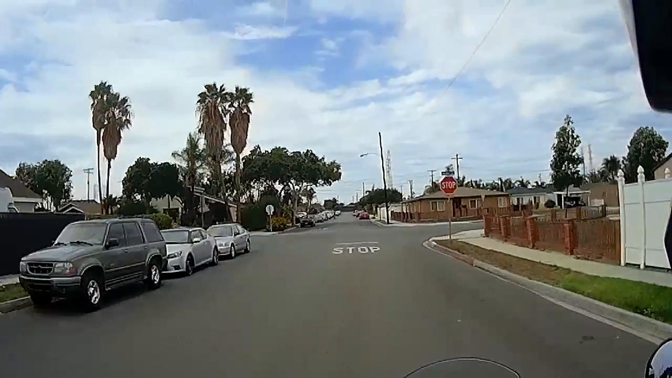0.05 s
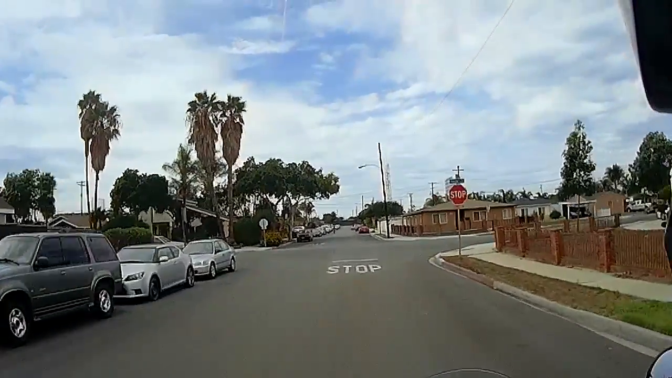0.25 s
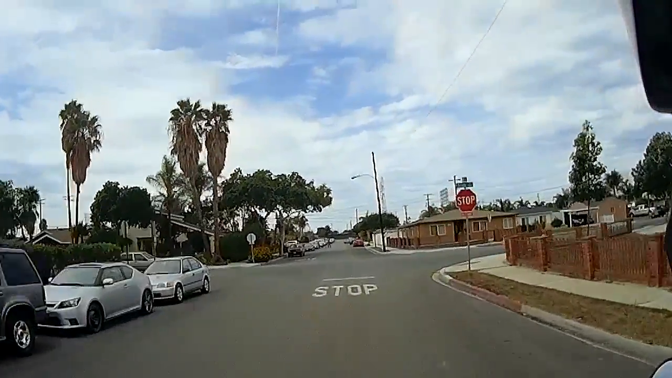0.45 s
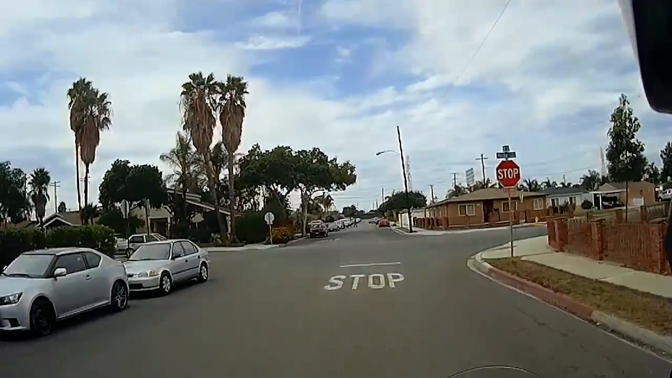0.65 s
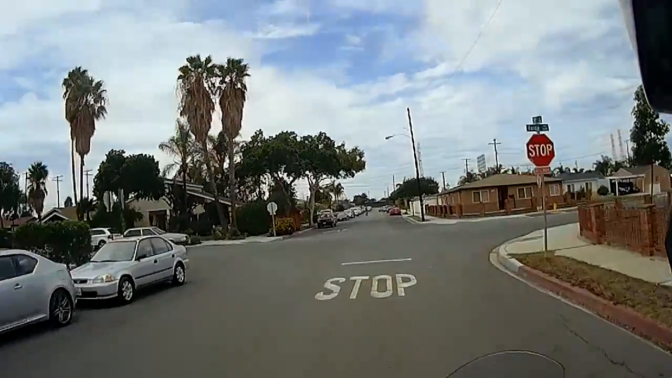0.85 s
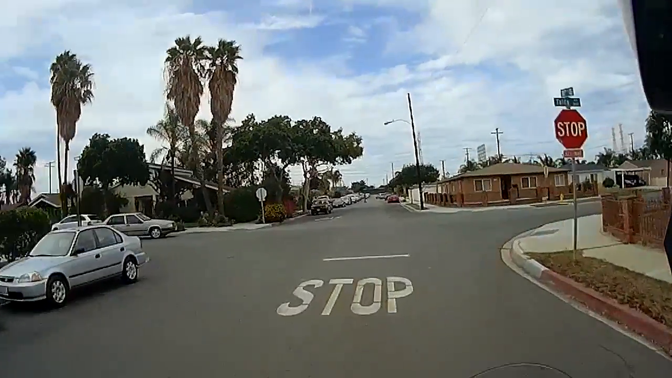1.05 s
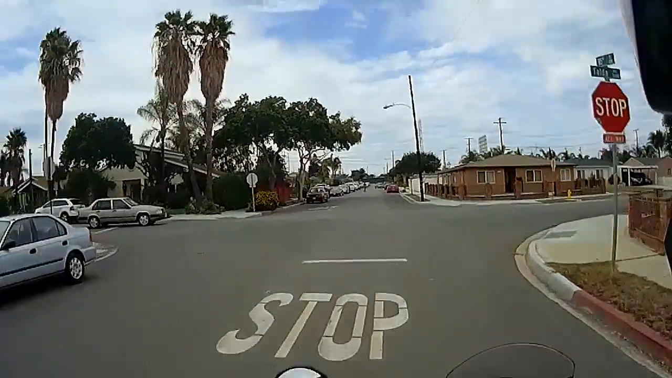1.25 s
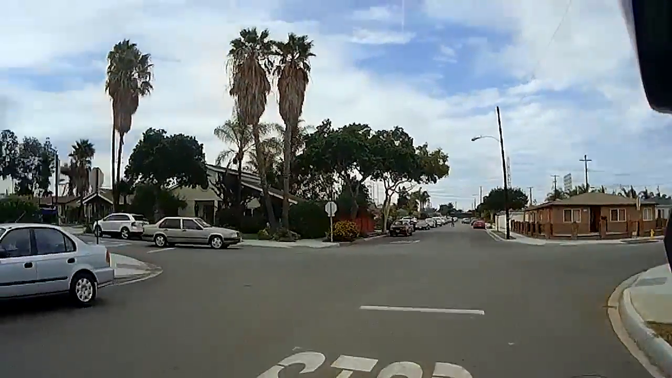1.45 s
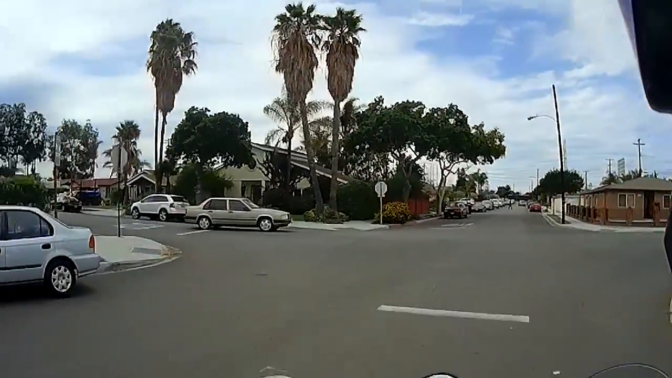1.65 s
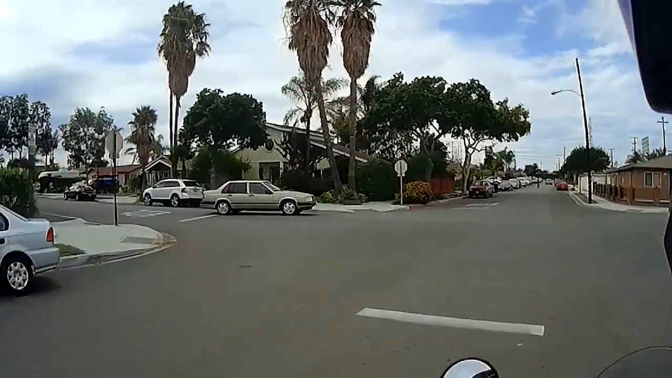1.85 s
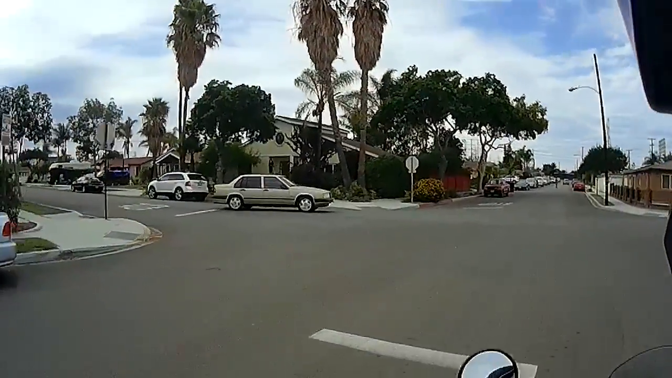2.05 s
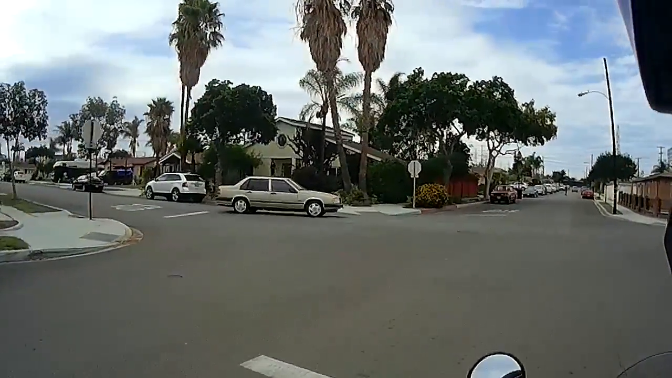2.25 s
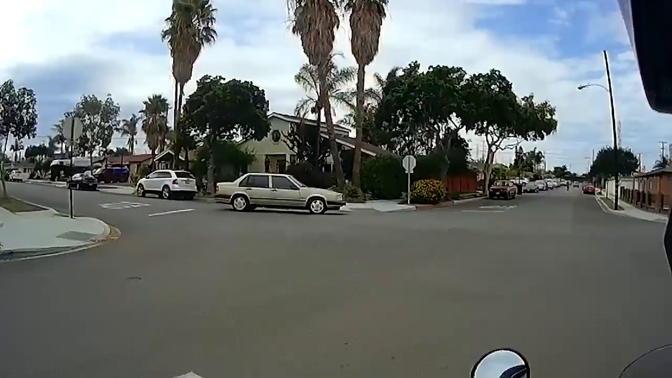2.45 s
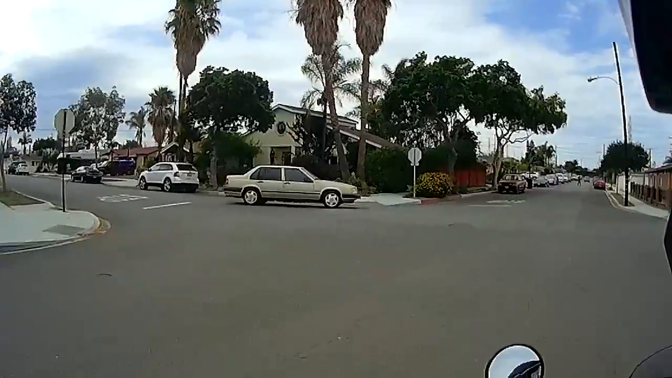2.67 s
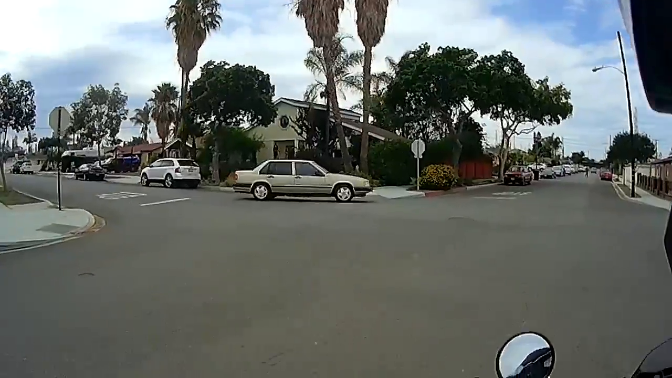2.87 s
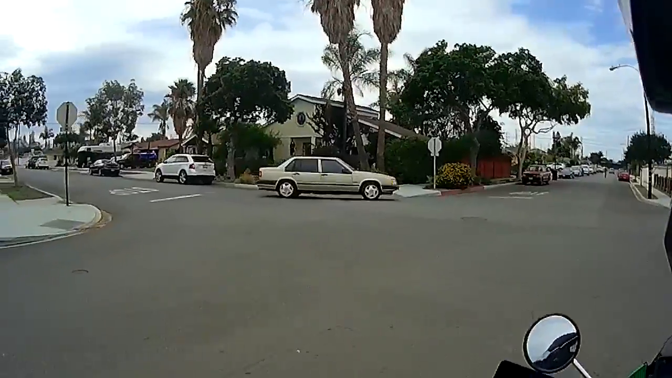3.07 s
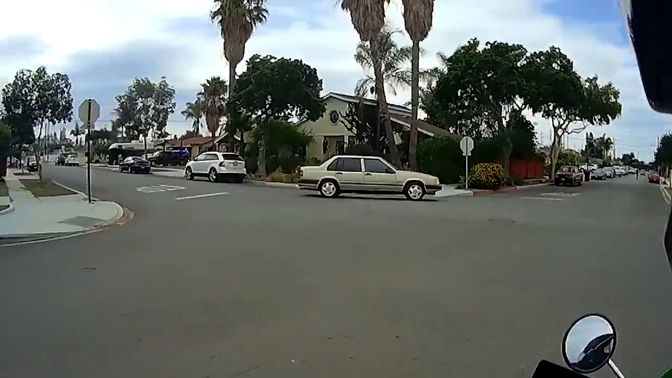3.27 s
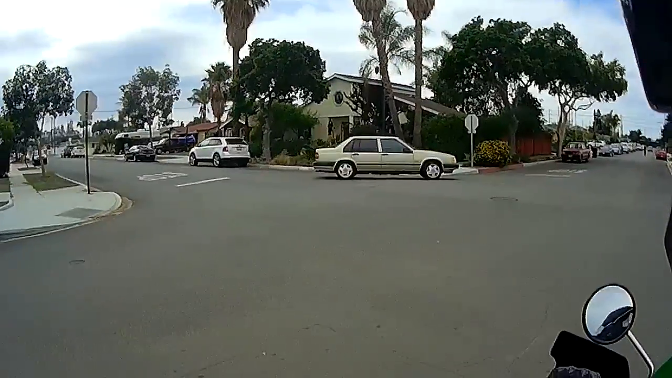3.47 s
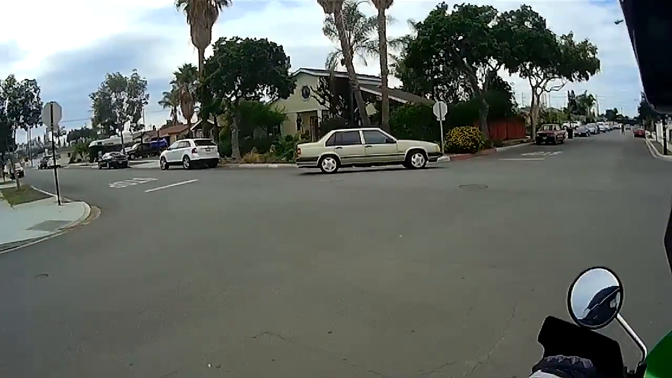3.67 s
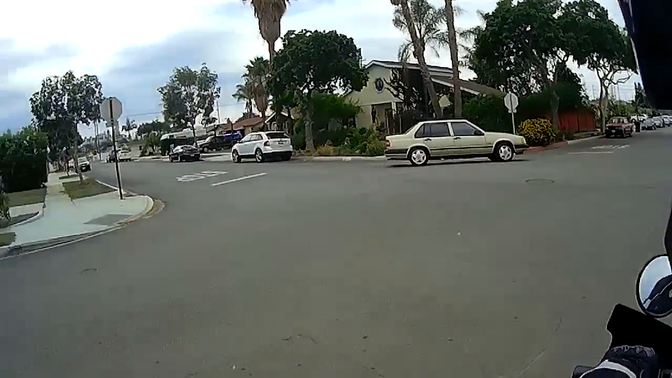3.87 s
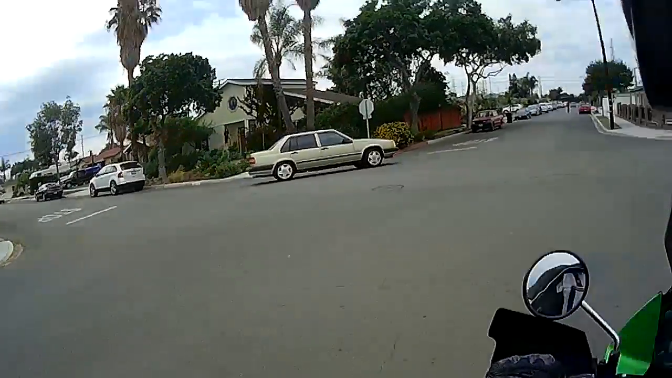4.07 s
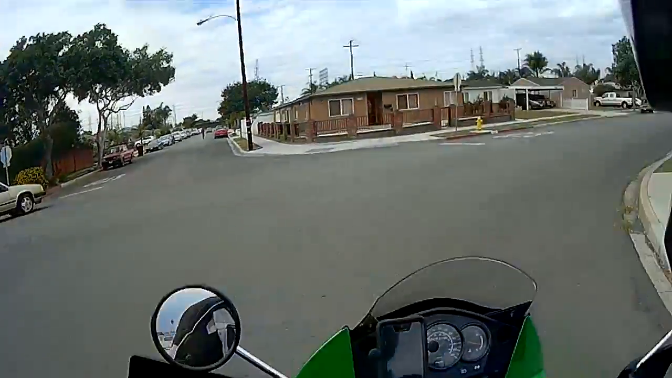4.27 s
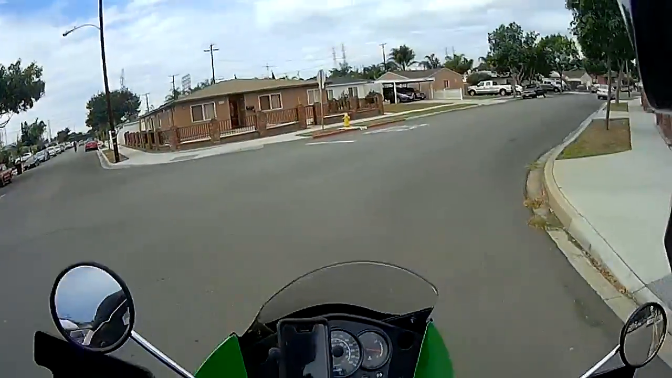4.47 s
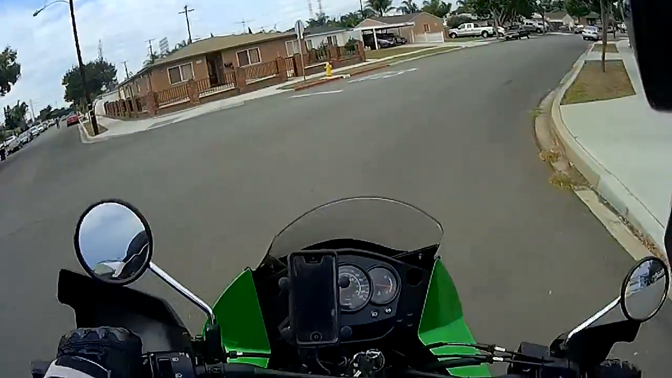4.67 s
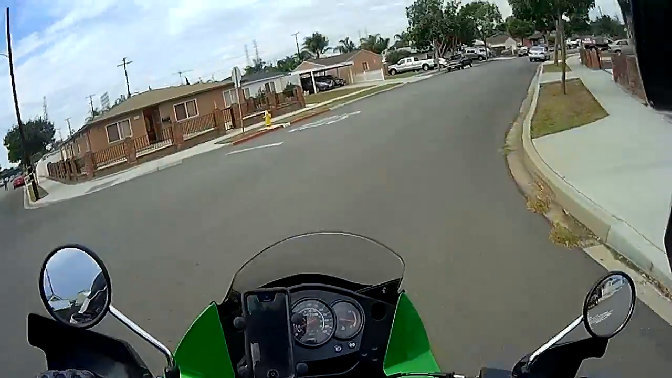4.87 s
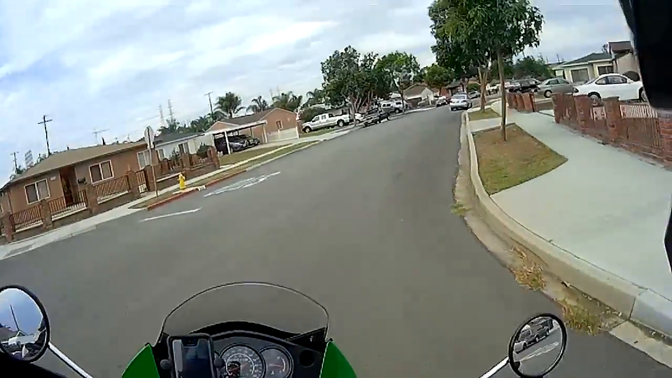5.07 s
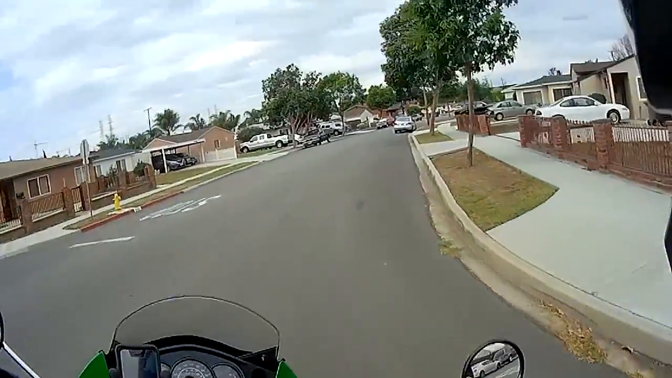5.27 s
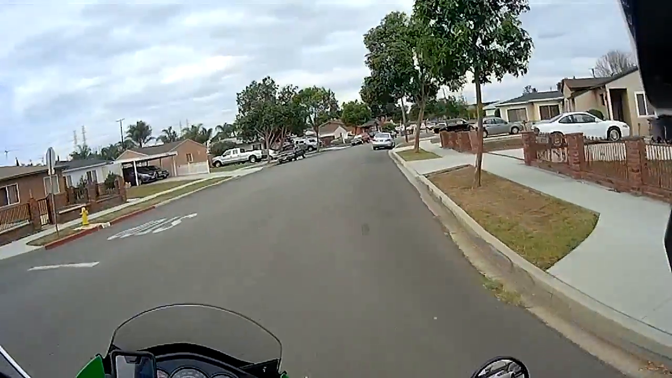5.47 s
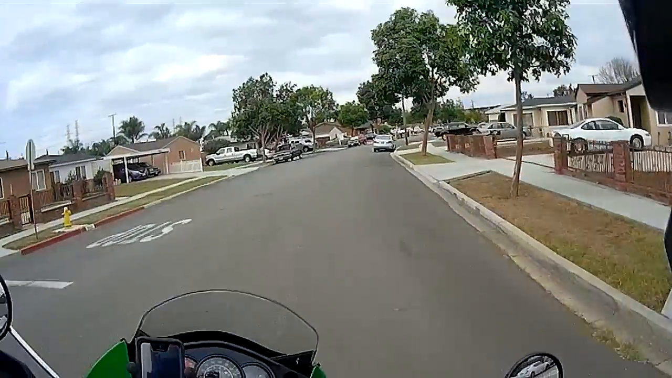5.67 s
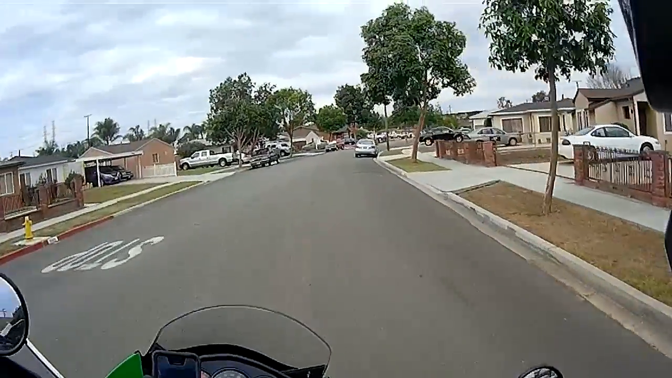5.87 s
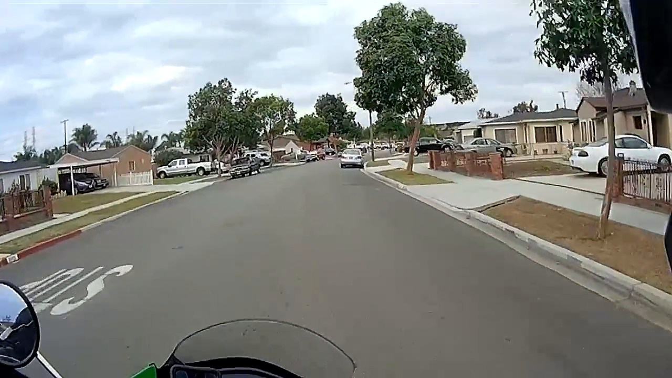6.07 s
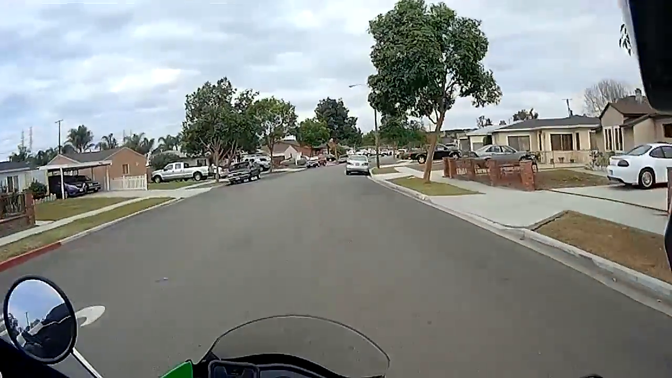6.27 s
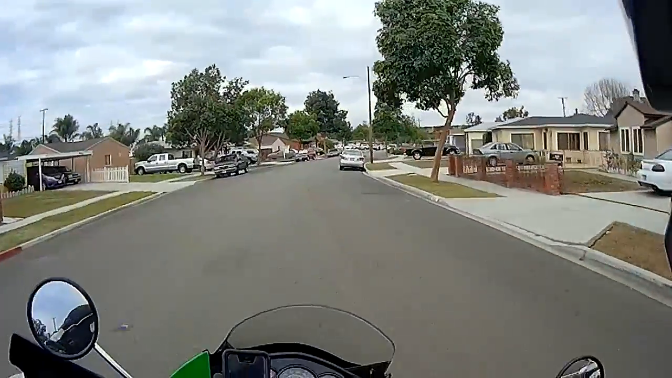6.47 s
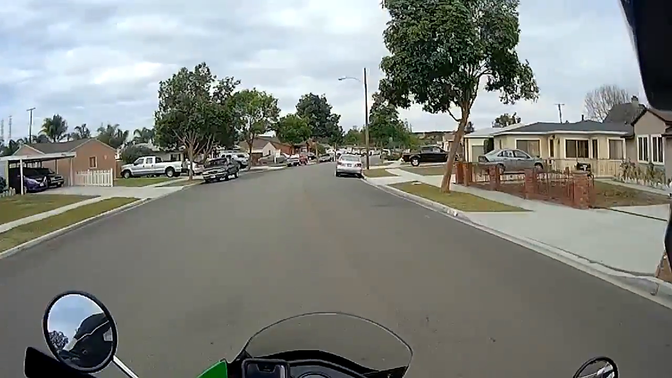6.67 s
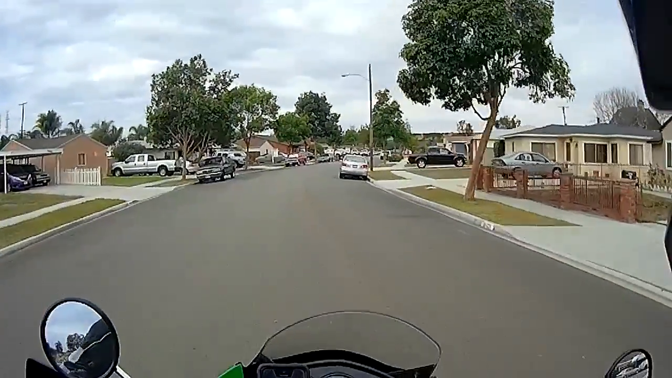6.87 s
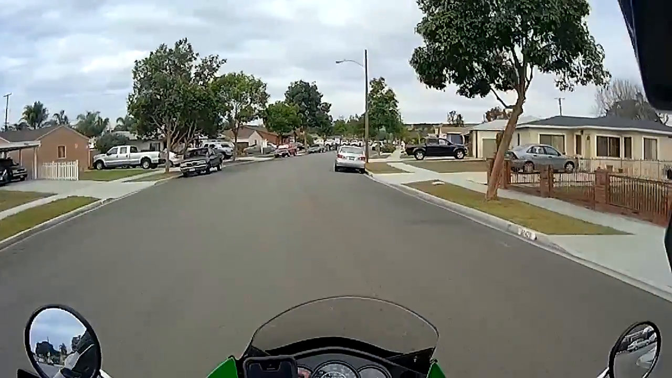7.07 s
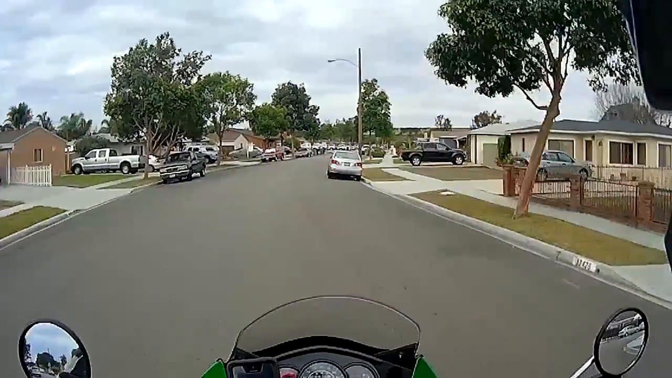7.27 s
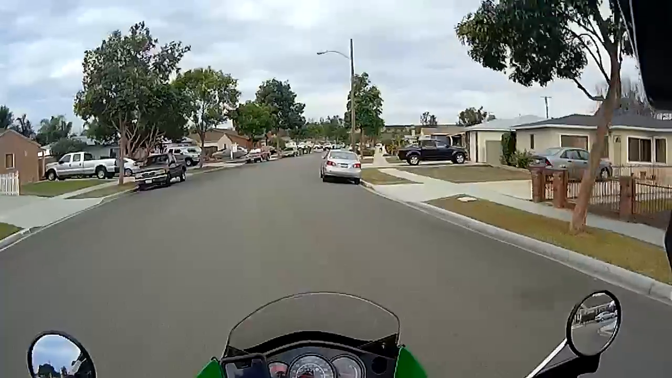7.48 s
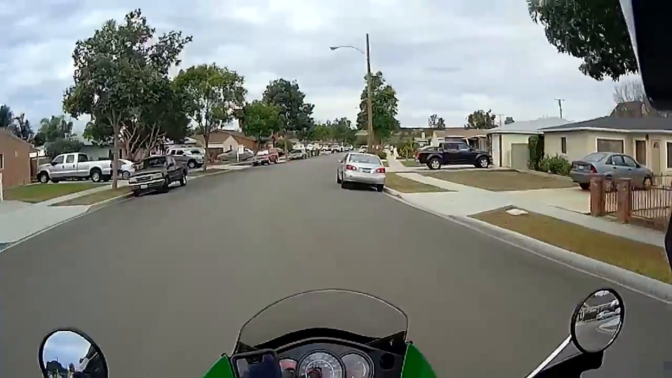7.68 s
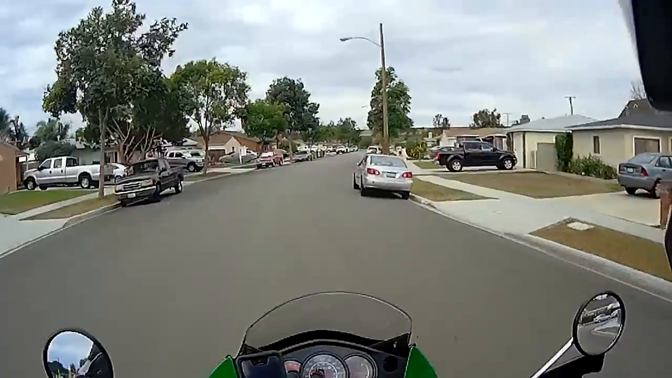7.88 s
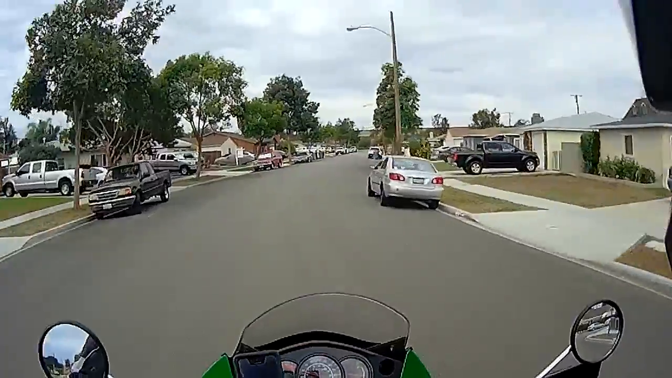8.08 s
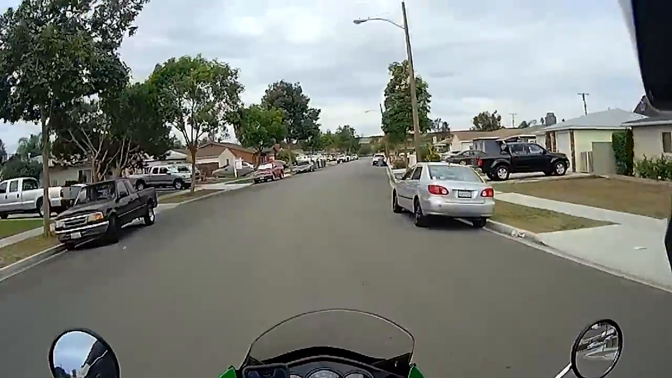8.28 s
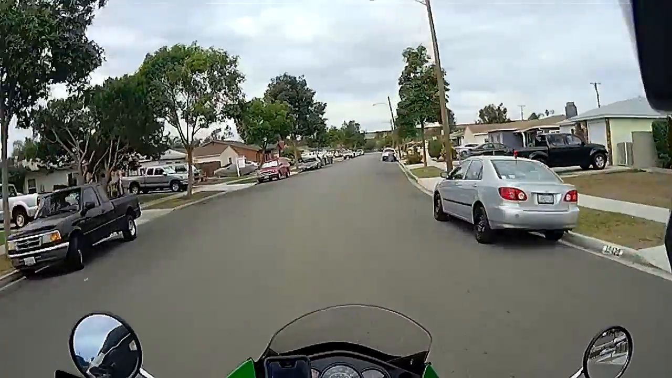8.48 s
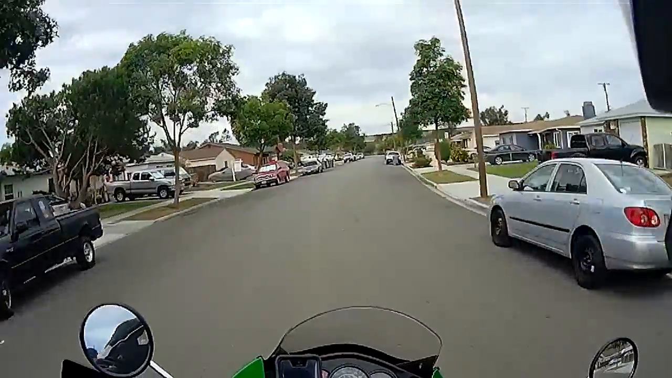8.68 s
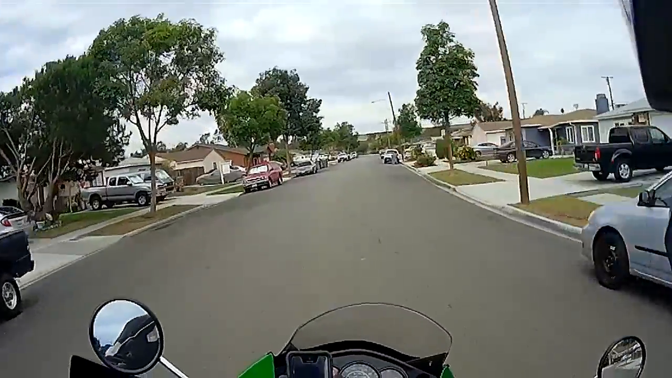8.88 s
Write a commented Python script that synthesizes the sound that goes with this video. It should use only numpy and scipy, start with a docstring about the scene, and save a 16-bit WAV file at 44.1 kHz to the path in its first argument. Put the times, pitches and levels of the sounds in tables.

```python
"""A single-cylinder four-stroke motorcycle, heard from the rider's helmet: it brakes to a junction, idles,
pulls away, changes up and speeds on. Separate exhaust blows thump and ring the pipe at idle, then merge
into a growl under load, while combustion knock and valve ticks pump a roar and a clatter in the metal.
Brake pads rub and squeal, the gear lever clinks, and gusts of wind buffet the microphone at speed."""
import sys
import numpy as np
from scipy import signal
from scipy.fft import rfft, irfft
from scipy.io import wavfile
from scipy.ndimage import uniform_filter1d

SR = 44100
rng = np.random.default_rng(int(sys.argv[2]) if len(sys.argv) > 2 else 0)


def generate_wav(sig):
    """Save sig (samples, or channels by samples) to the path in sys.argv[1] as 16-bit PCM at SR."""
    pcm = np.round(np.clip(np.atleast_2d(sig).T, -1, 1) * 32767).astype(np.int16)
    wavfile.write(sys.argv[1], SR, pcm)


N = 393813

# Firing rate of the cylinder: t/s, f/Hz
FIRING_RATE = [(0.0, 26.46), (0.6, 19.25), (0.8, 23.51), (1.4, 13.5), (1.95, 9.82), (2.93, 10.33),
               (3.35, 10.06), (3.5, 8.15), (3.6, 12.95), (4.0, 22.66), (4.19, 25.16), (4.49, 24.31),
               (5.08, 23.4), (5.57, 30.35), (6.17, 37.13), (6.3, 37.09), (6.63, 26.73), (6.87, 23.69),
               (8.13, 30.98), (8.93, 34.96)]
# Throttle and load (how far the blows merge into a growl): t/s, throttle/0-1, load/0-1
THROTTLE_AND_LOAD = [(0, 0.05, 0.24), (.61, 0, 0.32), (.65, 0.76, .9), (.74, 0.62, 0.3), (.85, 0.16, 0.42),
                     (1.5, 0, .13), (1.95, 0, 0), (3.45, 0, 0), (3.6, .95, .12), (4.05, 1, .2),
                     (4.3, .8, .8), (5.05, 1, 0.67), (6.28, 0.68, 0.83), (6.4, 0, 0.5), (6.72, 0.07, 0.7),
                     (7.0, 0.96, 1), (8.93, 1, 0.92)]
# Fader of the engine case roar; thump, pipe and clatter follow it: t/s, level/dB
ROAR_LEVEL = [(0, -34.5), (.3, -38.5), (.63, -41), (.67, -36.5), (.77, -33), (1.15, -37), (1.33, -44.5),
              (1.48, -41), (2.06, -48.5), (2.7, -50), (3.52, -50), (3.93, -34.5), (4.3, -32.5),
              (5.4, -27.5), (5.54, -25), (5.66, -29.5), (6.12, -27), (6.32, -29), (6.39, -27), (6.74, -38),
              (6.87, -35), (7.25, -30.5), (8.93, -27.5)]
# After-ring of the exhaust pipe: f/Hz, width/Hz, level/dB
PIPE_MODES = [(182.6, 11, -8), (251, 13, 0.5), (358.4, 20, -15)]
# Accents on the growl's overtones: multiple of the firing rate, low-rev level/dB, high-rev level/dB
OVERTONE_ACCENTS = [(1, -3, -7), (2, 3, 8), (3, -4, 0), (4, -2, 4), (5, 4, -9), (6, -2, -5), (7, -11, 1),
                    (8, 2, 6), (9, 5, 7), (10, 3, -6), (11, 0, 5), (12, 3, -7), (13, 1, -2), (14, 3, -1),
                    (17, 2, 2), (18, -6, -2), (19, 1, 6), (20, -8, -2), (21, 4, 0), (24, 3, 0), (28, -2, 7),
                    (35, 4, 3), (36, 3, 4), (38, 7, 5), (41, 3, 3)]
# How pipe and frame pass those overtones: f/Hz, level/dB
BODY_RESPONSE = [(20, -8), (60, -5), (128, -3), (148, 3), (168, -14), (215, -14), (280, 0), (340, -7),
                 (420, -12), (500, -18), (600, -17), (720, -26), (940, -18), (1250, -17), (1420, -20),
                 (1600, -32)]
# Noise spectra of the case roar at low and high revs: f/Hz, level/dB
ROAR_LOW_REVS = [(250, -27), (430, 0), (464, -9.5), (623, -3), (704, -7), (865, -2), (912, -7), (939, 1.5),
                 (973, -12), (1020, -2), (1140, -6), (1240, -1.5), (1750, -16), (2280, -20), (3850, -120)]
ROAR_HIGH_REVS = [(250, -48), (430, 2), (516, -11.5), (605, -13), (708, -4), (855, -4.5), (928, -5),
                  (1240, 1), (1390, -3), (1670, -13), (1750, -11), (2280, -18), (3850, -120)]
# Noise spectra of the clatter at idle and under load: f/Hz, level/dB
CLATTER_IDLE = [(970, -25), (1650, -9), (2680, -9), (3230, -8.5), (3980, -7), (4380, -6.5), (4820, -10),
                (7960, -5), (9800, -8), (13800, -8), (15900, -24)]
CLATTER_LOADED = [(970, 13), (1650, -8.5), (2030, 3), (2860, -5.5), (5450, -4), (5930, -4), (6460, -3.5),
                  (12100, -4.5), (15200, -12), (15900, -30)]
# Valve ticks within one firing cycle: place/cycles, decay/cycles, weight
VALVE_TICKS = [(.89, .12, 1.01), (.25, .11, .95), (.58, .07, .6)]
# Fins and covers ringing inside the clatter: f/Hz, width/Hz, level/dB above the rest
METAL_MODES = [(1870, 36, 11), (2450, 220, 3.5), (3400, 650, 4), (4730, 110, 4), (5400, 290, 4),
               (6450, 250, 5), (7440, 100, 3), (9000, 230, -0.5), (12200, 390, 2.5)]
# A cover rings as the throttle opens: centre t/s, length/s, level/dB
COVER_SWELLS = [(3.9, .3, -37), (4.42, 0.84, -32.5), (7.35, .5, -43)]
# Pitches of the thin top-end whistles: f/Hz
SIZZLE_PITCHES = [13900, 14800, 15120]
# Their fader: t/s, level/dB
SIZZLE_LEVEL = [(4.0, -80), (5.6, -60), (5.95, -42), (6.2, -60), (6.5, -68), (7.28, -62), (8.93, -67)]
# Pads rubbing the brake disc: t/s, level/dB, f/Hz
BRAKE_RUB = [(.1, -63, 4400), (.3, -55, 4400), (.6, -57, 4370), (1.07, -52, 4440), (1.32, -64, 4350),
             (1.47, -55, 4470), (1.95, -65, 4450)]
# Short brake squeals: centre t/s, length/s, level/dB
BRAKE_SQUEALS = [(1.55, .03, -54), (1.61, .04, -56), (1.857, .03, -48), (2.437, 0.023, -53),
                 (2.475, .04, -58), (2.745, .03, -57), (2.788, .03, -39)]
# Gear lever hits: t/s, level/dB
LEVER_HITS = [(2.909, -36), (.79, -36), (6.39, -32)]
# Ring of the lever: f/Hz, relative level/dB, t60/s
LEVER_MODES = [(7750, -12, .03), (9740, 10, 0.027), (11650, -8, .025), (14000, -4, .02), (14620, -9, .025)]
# Wind rumble, growing with road speed and gusting: t/s, level/dB
WIND_LEVEL = [(0, -19), (.45, -24), (.62, -21.5), (.8, -28), (1.0, -22.5), (1.33, -36), (1.5, -25),
              (1.95, -43.5), (3.5, -45), (4.3, -50), (5.1, -37), (5.5, -31), (6.2, -32), (6.6, -21),
              (6.75, -24.5), (7.05, -22.5), (7.93, -13.5), (8.6, -13), (8.76, -7), (8.93, -13.5)]
# Noise spectra of the wind's rumble and upper flutter: f/Hz, level/dB
WIND_RUMBLE = [(4.7, -40), (8.0, -16), (38, 0.5), (104, -4.5), (175, -11.5), (230, -58), (390, -120)]
WIND_FLUTTER = [(160, -3), (175, 3.5), (250, 2), (330, -4.5), (450, -17), (480, -50)]

PIPE_HZ, INTAKE_HZ, COVER_HZ, SQUEAL_HZ = 84, 46, 938, 12780
IDLE_ROAR_DB, STILL_WIND_DB = -50, -48
RIDE_SAMPLES = 9000  # smoothing span that holds a layer steady ahead of its fader


def engine(cycles, rate):
    """Exhaust blows, case roar and clatter, mixed by throttle, load and revs."""
    roar_db = curves(ROAR_LEVEL)[0]
    throttle, load = np.clip(curves(THROTTLE_AND_LOAD), 0, 1)
    revs = np.clip((rate - 24) / 10, 0, 1)
    effort_db = roar_db - IDLE_ROAR_DB
    thump_db = -35.5 + 0.54 * effort_db
    pipe_db = -42.5 + 0.79 * effort_db + throttle * (3 + 2.5 * revs)
    clatter_db = -55.5 + 0.95 * effort_db - revs + 2 * throttle
    knock = 9.5 * throttle * (1 - 0.75 * revs)  # bites hardest wide open at low revs
    valves = 7 - 6.5 * throttle  # ticks stand out with the throttle shut
    growl_low, growl_pipe, growl_roar = growl(cycles, rate, revs)
    blows = cycles + .08 * np.minimum(load / .12, 1)  # the blow lands earlier under load
    return (gain_of(thump_db) * blend(thump(blows), growl_low, load)
            + gain_of(pipe_db) * blend(pipe(blows), growl_pipe, load)
            + gain_of(roar_db) * case_roar(cycles, growl_roar, throttle, revs, knock, valves)
            + gain_of(clatter_db) * clatter(cycles, throttle, load, revs, knock, valves))


def thump(cycles):
    """An exhaust blow at the pipe's lowest note, then the slower gulp of the intake."""
    blow = puffs(clicks(cycles, .005, spread_db=1.2), PIPE_HZ, periods=1.5)
    gulp = puffs(clicks(cycles, .24, spread_db=1.2), INTAKE_HZ, periods=1.07)
    return ride(blow - 0.48 * gulp)


def pipe(cycles):
    """The blow also sounds the pipe's third harmonic, which squares it off, and leaves a faint ring."""
    blow = clicks(cycles, .005, spread_db=1.2)
    third = puffs(blow, 3 * PIPE_HZ, periods=4.5)
    drive = blow - 0.5 * clicks(cycles, .3, spread_db=2.5)
    ring = sum(gain_of(db) * resonate(drive, hz, width) for hz, width, db in PIPE_MODES)
    return ride(ride(third) + 0.38 * ride(ring))


def growl(cycles, rate, revs):
    """Under load the blows merge into wavering overtones, split into low, pipe and roar bands."""
    step = 8  # no treble here, so a lower sample rate will do
    cycles, rate, revs = cycles[::step], rate[::step], revs[::step]
    n = len(cycles)
    bands, knots = np.zeros((3, n)), np.linspace(0, n, 70)
    accents = {k: (slow, fast) for k, slow, fast in OVERTONE_ACCENTS}
    for k in range(1, 56):
        waver, slip = (np.interp(np.arange(n), knots, v) for v in rng.standard_normal((2, len(knots))))
        hz = k * rate
        slow_db, fast_db = accents.get(k, (0, 0))
        phase = 2 * np.pi * (k * (cycles - .1) + min(k / 5, 1) * rng.random()) + (.15 + .015 * k) * slip
        db = level_at(BODY_RESPONSE, hz) + slow_db + revs * (fast_db - slow_db) + (1.2 + .05 * k) * waver
        above_low, above_pipe = np.clip((hz - 150) / 40, 0, 1), np.clip((hz - 430) / 40, 0, 1)
        crossover = np.array([1 - above_low, above_low - above_pipe, above_pipe])
        bands += crossover * gain_of(db) * np.cos(phase)
    return [ride(band[:N]) for band in signal.resample_poly(bands, step, 1, axis=1)]


def case_roar(cycles, overtones, throttle, revs, knock, valves):
    """The engine case's pulsing midrange, turning from noise to pitch with throttle and revs."""
    hiss = blend(noise(ROAR_LOW_REVS), noise(ROAR_HIGH_REVS), revs)
    pitched = throttle * (0.24 + 0.54 * revs)
    return rattle(cycles - 0.05, blend(hiss, overtones, pitched), 0.9 * knock, 0.8 * valves)


def clatter(cycles, throttle, load, revs, knock, valves):
    """Bright rattling metal, with pings from the knock and the valves on top."""
    working = np.maximum(np.sqrt(load), throttle)
    hiss = blend(noise(CLATTER_IDLE), noise(CLATTER_LOADED, METAL_MODES), working)
    bed = rattle(cycles, hiss, 1.35 * knock, valves)
    knock_pings = gain_of(-10.5) * throttle * (1 - revs) * pings(cycles, place=.77)
    valve_pings = gain_of(-15.5) * (1 - throttle) * pings(cycles, place=.91)
    return bed + knock_pings + valve_pings


def rattle(cycles, sound, knock, valves):
    """Combustion knock and valve ticks pump the level of the sound in the engine's metal."""
    pump_db = knock * burst(cycles, 0.771, decay=0.43)
    pump_db += valves * sum(weight * burst(cycles, place, decay) for place, decay, weight in VALVE_TICKS)
    return ride(sound * gain_of(pump_db + 0.38 * drift(hz=30.5)))


def pings(cycles, place):
    """Each hit rings the high modes of fins and covers, a different few standing out every cycle."""
    return ride(sum(gain_of(db) * resonate(clicks(cycles, place, spread_db=5.5), hz, width=99)
                    for hz, _, db in METAL_MODES if hz > 5000))


def cover(cycles):
    """Each combustion knock strikes the cover's one clear mode, which swells in and out."""
    strikes = clicks(cycles, .76, spread_db=2.1) + .012 * rng.standard_normal(N)
    return swells(COVER_SWELLS) * ride(resonate(strikes, COVER_HZ, width=60))


def sizzle():
    """Thin flickering whistles at the very top, swelling briefly around six seconds."""
    whistles = sum(noise_band(hz, width=150) * gain_of(5 * drift(hz=25)) for hz in SIZZLE_PITCHES)
    return gain_of(curves(SIZZLE_LEVEL)[0]) * unit_rms(whistles)


def brakes():
    """Pads rub the disc as a fuzzy band, with a faint whine and short thin squeals."""
    t = np.arange(N) / SR
    rub_db, rub_hz = curves(BRAKE_RUB)
    rub = unit_rms(noise_band(rub_hz, width=210)) * gain_of(rub_db + 1.5 * drift(hz=12))
    rub *= (t > BRAKE_RUB[0][0]) * (t < BRAKE_RUB[-1][0])
    whine = unit_rms(noise_band(SQUEAL_HZ, width=250)) * gain_of(-71 + 6 * drift(hz=15))
    whine *= (t > .9) * (t < 2.5)
    squeal = np.sqrt(2) * np.sin(2 * np.pi * np.cumsum(SQUEAL_HZ + 40 * drift(hz=30)) / SR)
    return rub + whine + swells(BRAKE_SQUEALS) * squeal


def gear_lever():
    """The lever clinks: a sharp tick and a short metallic ring."""
    t, hits = np.arange(2000) / SR, np.zeros(N)
    ring = sum(gain_of(db - 60 * t / t60) * np.sin(2 * np.pi * hz * t) for hz, db, t60 in LEVER_MODES)
    tick = 0.57 * np.diff(rng.standard_normal(len(t) + 1)) * np.exp(-t / 0.0036)
    for start, db in LEVER_HITS:
        hits[round(start * SR)] = gain_of(db)
    return signal.oaconvolve(hits, ring / abs(ring).max() + tick)[:N]


def wind():
    """Air buffets the microphone in lumps; rumble and upper flutter share the same gusts."""
    gusts, rumble_db = drift(hz=23.5), curves(WIND_LEVEL)[0]
    flutter_db = -52 + 0.83 * (rumble_db - STILL_WIND_DB)
    rumble = ride(noise(WIND_RUMBLE) * gain_of(3.0 * gusts))
    flutter = ride(noise(WIND_FLUTTER) * gain_of(2.5 * gusts))
    return gain_of(rumble_db) * rumble + gain_of(flutter_db) * flutter


def clicks(cycles, place, spread_db):
    """One click per cycle at the given place, each of random strength."""
    count = np.floor(cycles - place)
    return np.diff(count, prepend=count[0]) * gain_of(spread_db * rng.standard_normal(N))


def puffs(triggers, hz, periods):
    """A short soft-edged pressure swing on every trigger."""
    t = np.arange(0, periods / hz, 1 / SR)
    swing = np.sin(2 * np.pi * hz * t) * signal.windows.tukey(len(t), .4)
    return signal.oaconvolve(triggers, swing)[:N]


def burst(cycles, place, decay):
    """A fast-attack, decaying envelope once a cycle, varying in strength."""
    part, count = np.modf(cycles - place + 1)
    strength = 1 + 0.12 * rng.standard_normal(400)[count.astype(int)]
    return strength * np.exp(-part / decay) * np.minimum(part / 0.04, 1)


def resonate(x, hz, width):
    """Two passes of a sweepable resonance of gain 1."""
    carrier = np.exp(2j * np.pi * np.cumsum(hz * np.ones(N)) / SR)
    r = np.exp(-np.pi * width / SR)
    return 2 * (carrier * signal.lfilter([(1 - r) ** 2], [1, -2 * r, r * r], x / carrier + 1e-18)).real


def noise_band(hz, width):
    """Narrow noise around hz."""
    return resonate(rng.standard_normal(N), hz, width)


def noise(spectrum, peaks=()):
    """Noise with the given spectrum and resonance peaks."""
    f = np.fft.rfftfreq(N, 1 / SR)
    peaks_db = sum(db / (1 + (2 * (f - hz) / width) ** 2) for hz, width, db in peaks)
    return unit_rms(irfft(rfft(rng.standard_normal(N)) * gain_of(level_at(spectrum, f) + peaks_db), N))


def drift(hz):
    """Random modulation up to about hz."""
    f = np.fft.rfftfreq(N, 1 / SR)
    return unit_rms(irfft(rfft(rng.standard_normal(N)) / (1 + (f / hz) ** 4), N))


def swells(rows):
    """A smooth fade in and out around each row's time."""
    t = np.arange(N) / SR
    return sum(gain_of(db) * np.cos(np.pi * np.clip((t - centre) / length, -.5, .5)) ** 2
               for centre, length, db in rows)


def curves(rows):
    """A table's columns as automation at every sample."""
    times, *columns = np.transpose(rows)
    return [np.interp(np.arange(N) / SR, times, column) for column in columns]


def level_at(spectrum, hz):
    """A spectrum's level at hz, -90 dB outside its range."""
    f, db = np.transpose(spectrum)
    return np.interp(np.log(hz + 1), np.log(f + 1), db, -90, -90)


def blend(a, b, share):
    """Equal-power crossfade."""
    return np.sqrt(1 - share) * a + np.sqrt(share) * b


def ride(x):
    """Ride the gain to keep the running rms near 1."""
    power = uniform_filter1d(uniform_filter1d(x ** 2, RIDE_SAMPLES), RIDE_SAMPLES)
    return x / np.sqrt(abs(power) + 1e-20)


def unit_rms(x):
    return x / np.sqrt(np.mean(x ** 2) + 1e-20)


def gain_of(db):
    return 10 ** (np.asarray(db) / 20)


def scene():
    """The mono mix; one count of firing cycles keeps the engine's layers in step."""
    rate = curves(FIRING_RATE)[0]
    cycles = .17 + np.cumsum(rate) / SR
    return (engine(cycles, rate) + wind() + cover(cycles) + sizzle() + brakes() + gear_lever())[None]


def record(dry):
    """The biggest gusts overload the input; a steep low-pass trims the very top."""
    overloaded = np.clip(dry, -.71, .71)
    low_pass = signal.firwin(1023, 15800, window=("kaiser", 9), fs=SR)
    return signal.oaconvolve(overloaded, low_pass[None], "same")


dry = scene()
out = record(dry)
generate_wav(out)
```